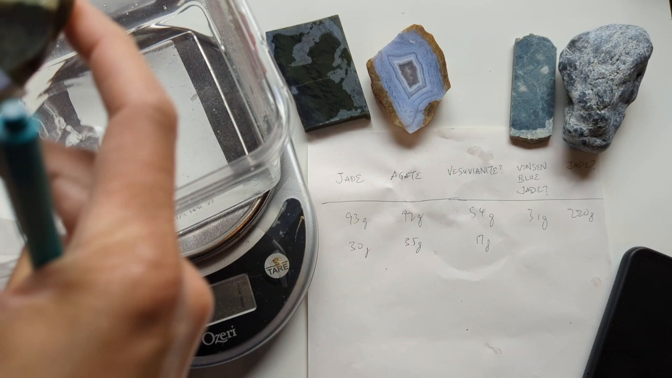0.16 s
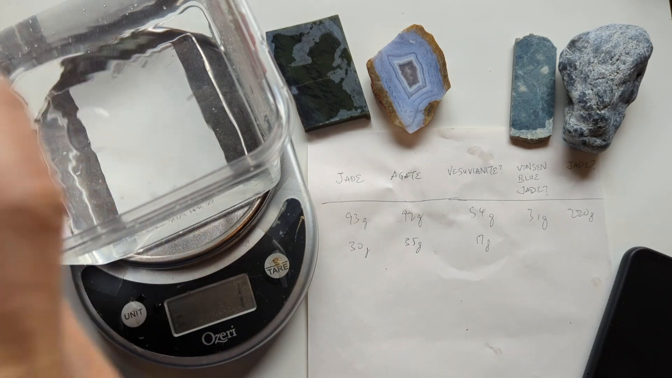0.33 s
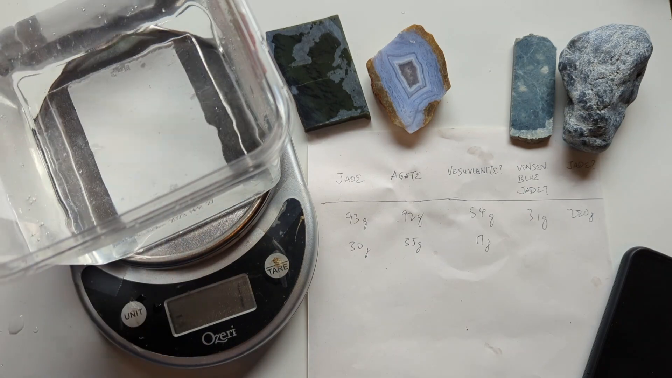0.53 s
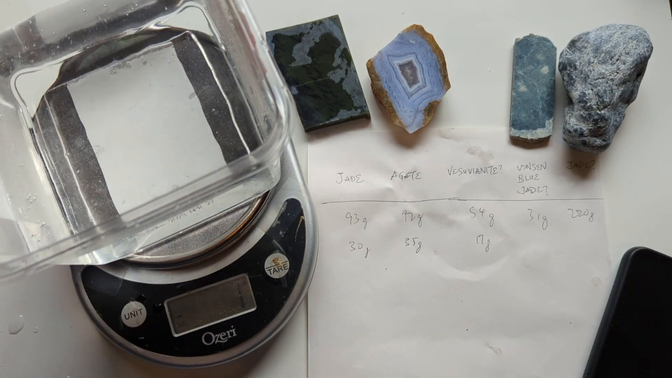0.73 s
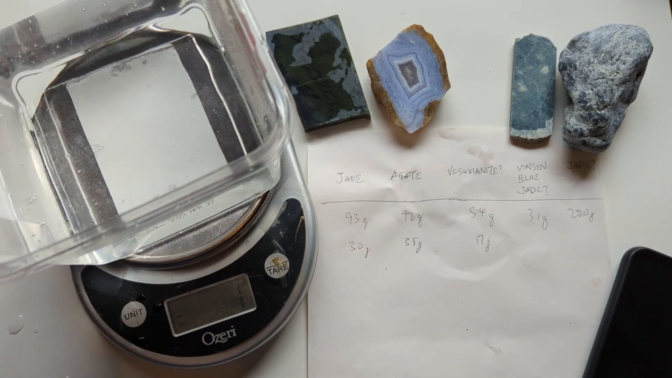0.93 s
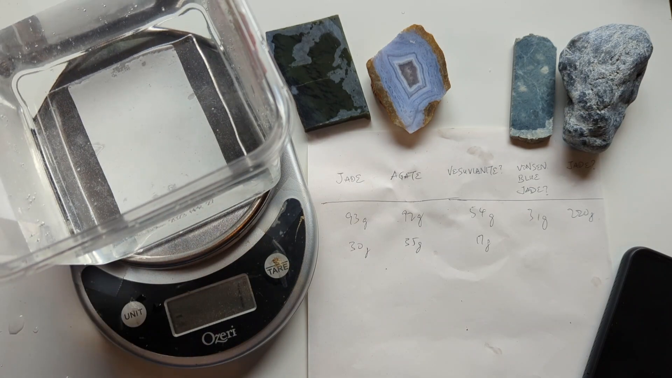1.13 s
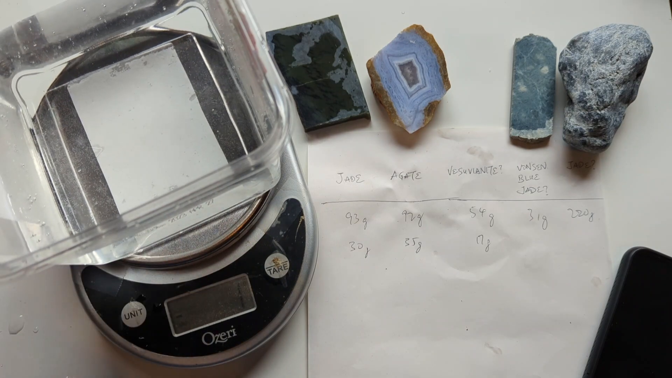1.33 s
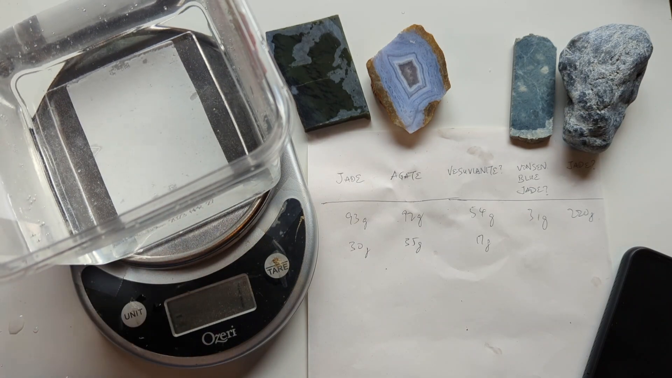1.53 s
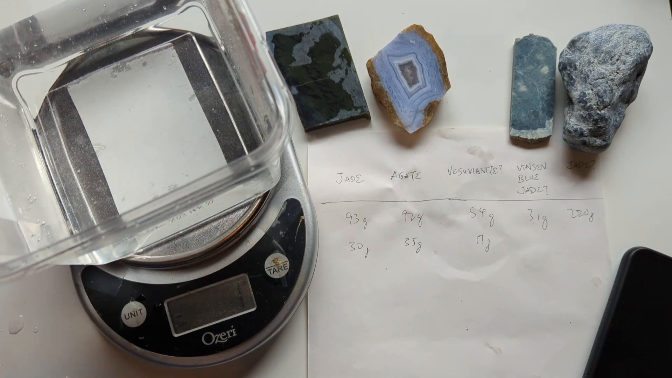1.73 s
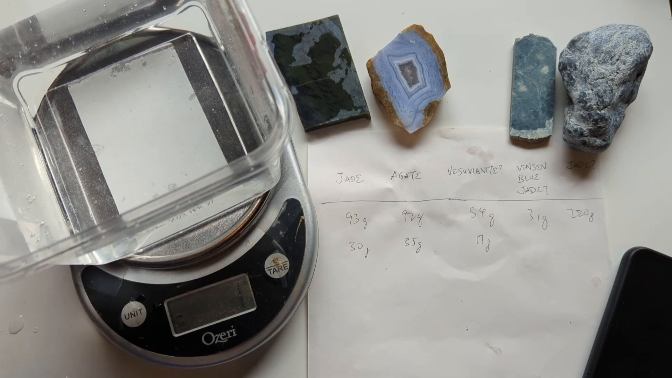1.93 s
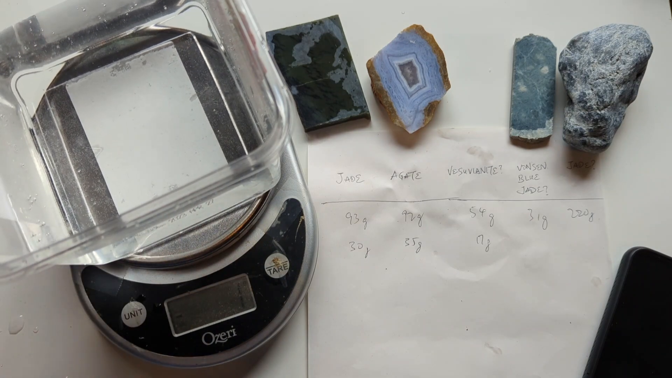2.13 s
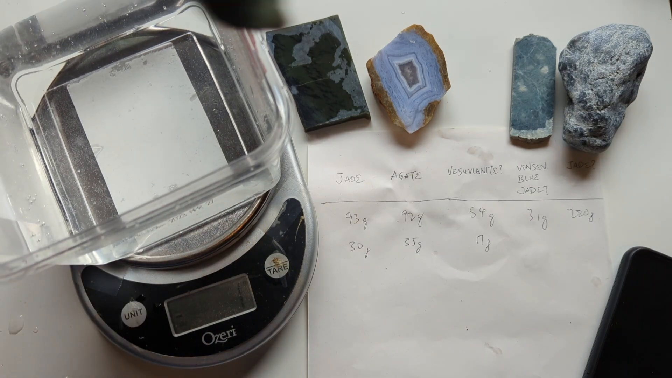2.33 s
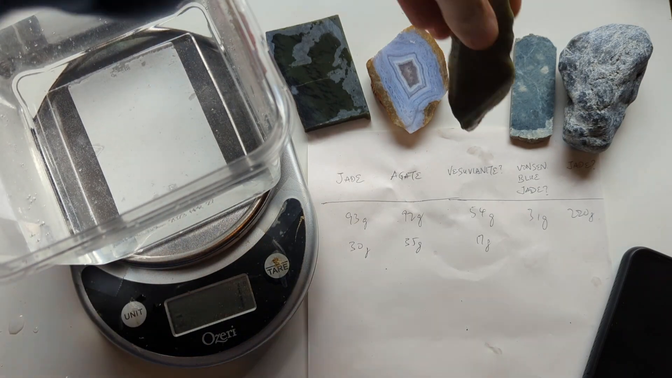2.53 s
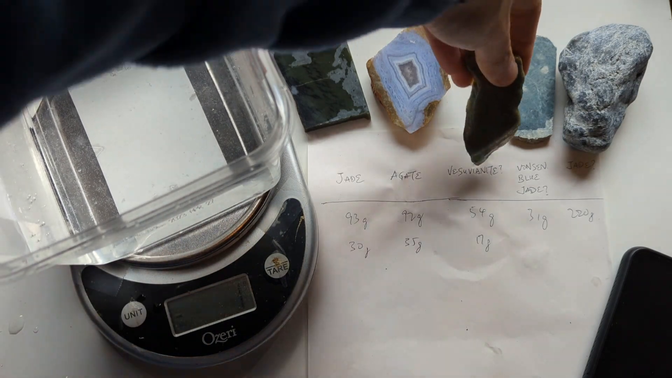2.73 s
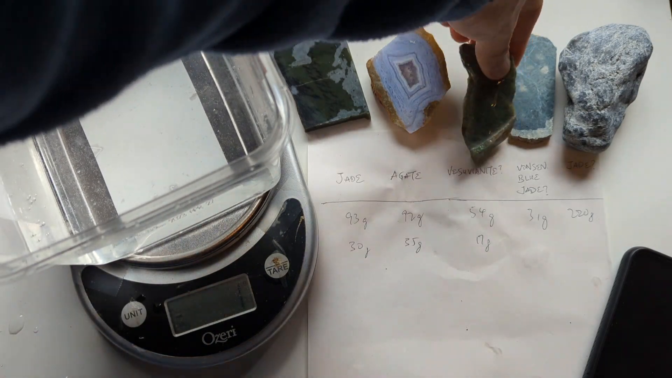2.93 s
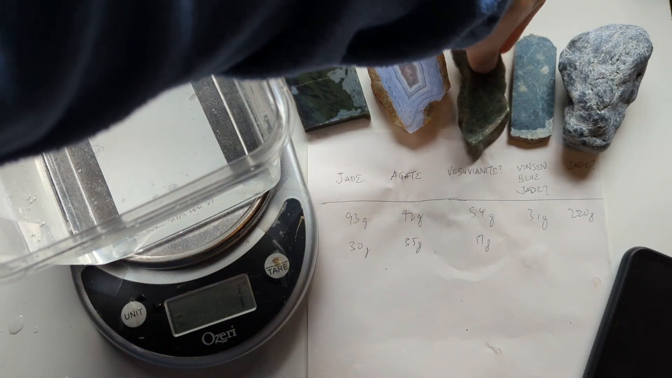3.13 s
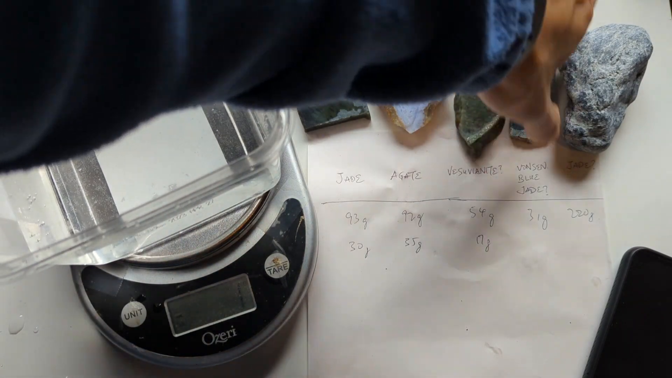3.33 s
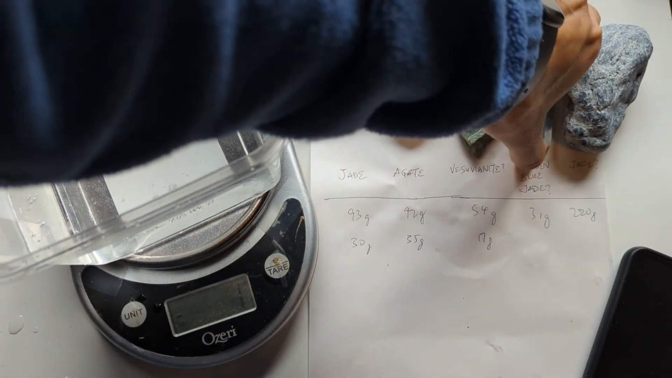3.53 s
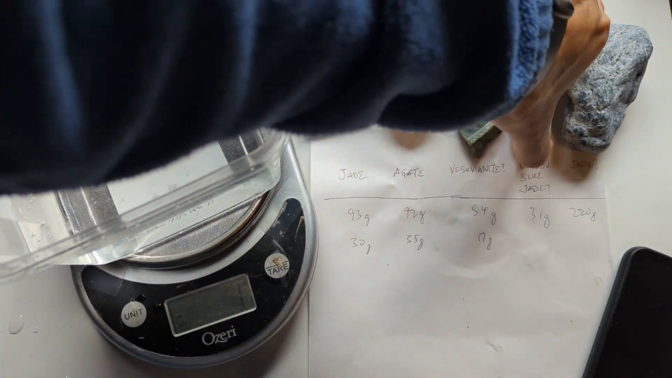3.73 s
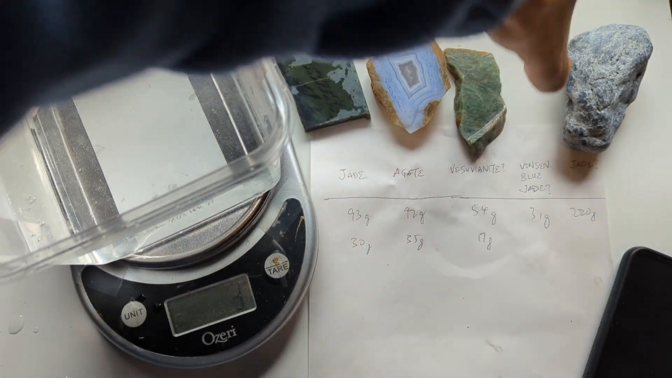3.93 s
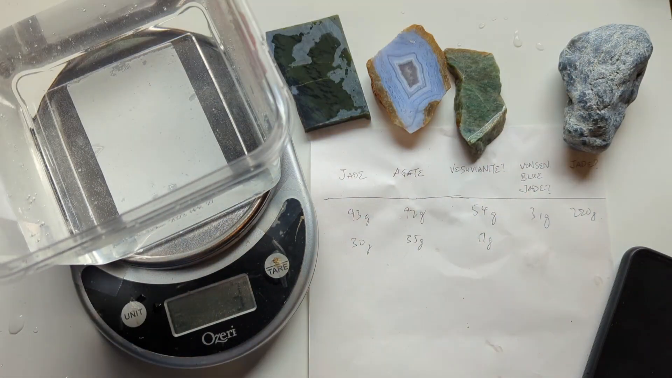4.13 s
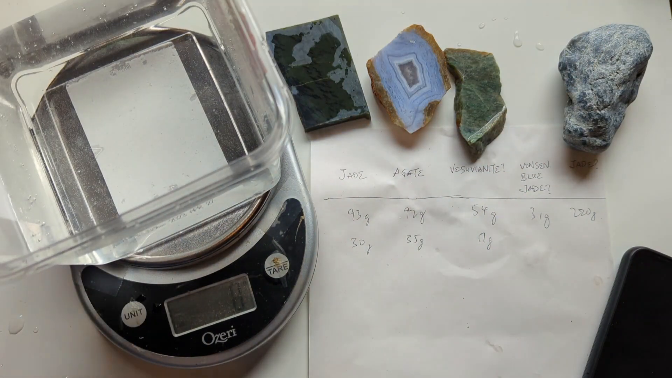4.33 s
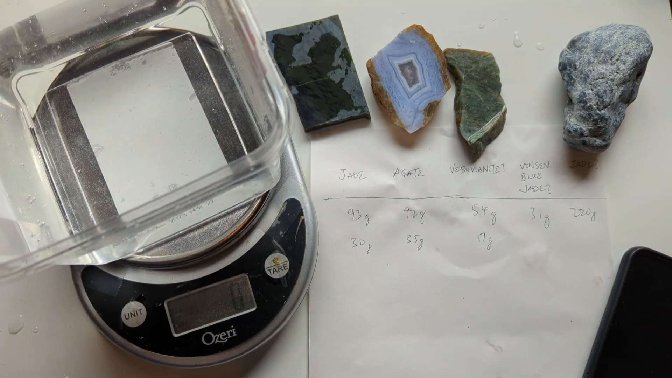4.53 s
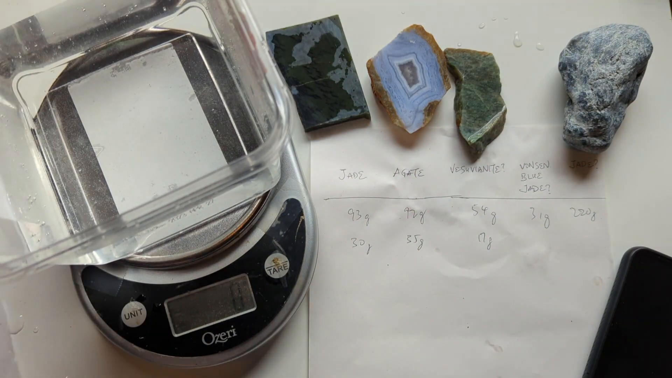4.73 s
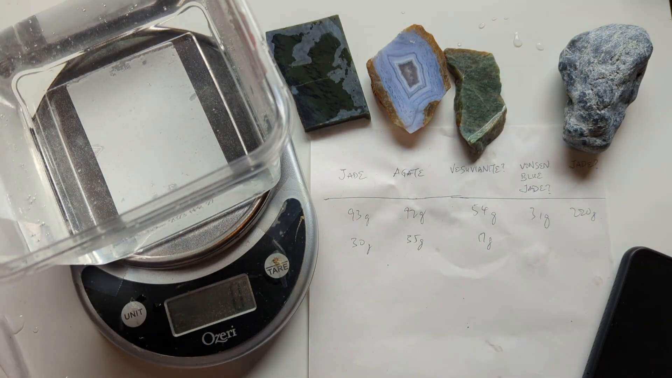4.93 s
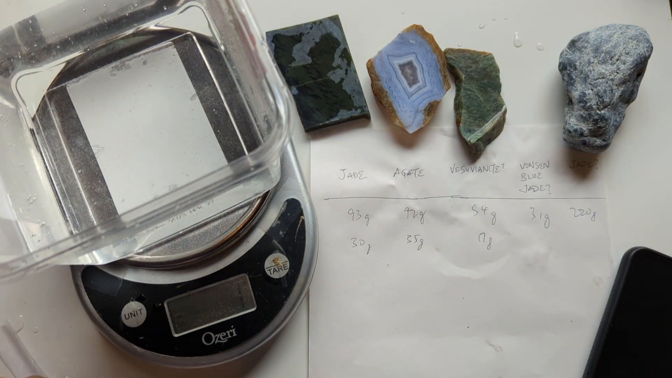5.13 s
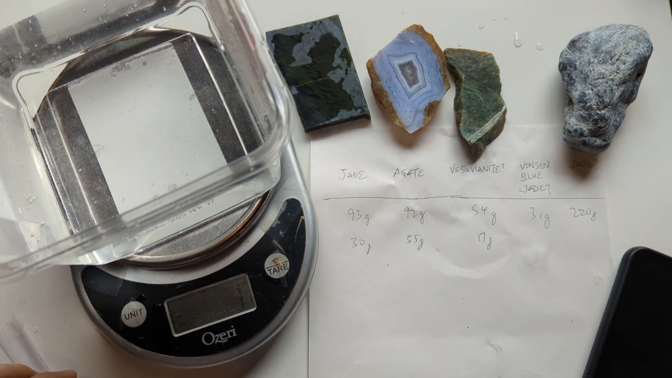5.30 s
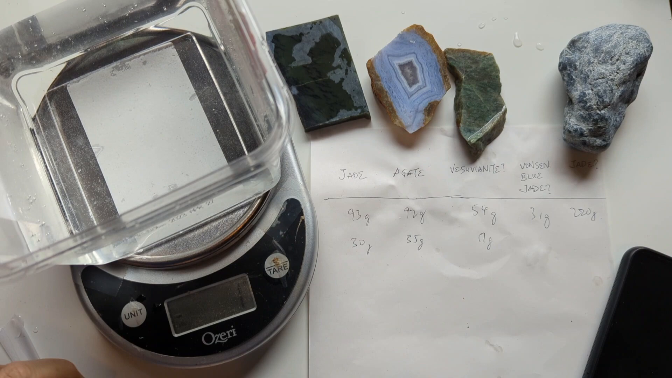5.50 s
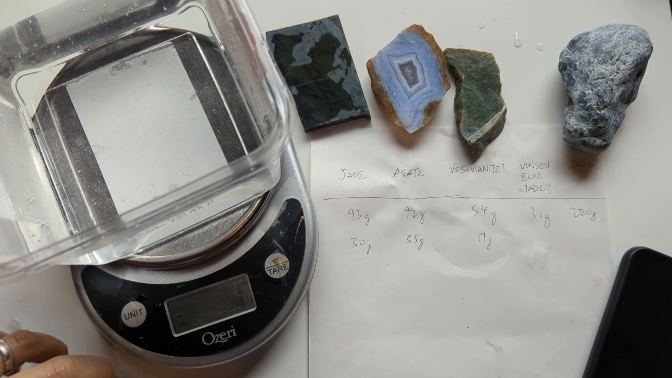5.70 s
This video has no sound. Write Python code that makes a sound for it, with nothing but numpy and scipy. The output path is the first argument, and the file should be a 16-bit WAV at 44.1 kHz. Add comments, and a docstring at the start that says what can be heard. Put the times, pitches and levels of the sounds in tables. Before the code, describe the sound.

In a quiet room, faint rustling precedes a stone knocking onto a papered table, then a sharper, louder clack, small scrapes and dry ticks.

```python
"""A faint room rumble runs throughout, as shaped noise, under rustles and ticks of fingers, paper and sleeve,
made of filtered random clicks. Stones are handled on a paper-covered table close to a stereo microphone:
a knock and later a clack, as stone resonances over table modes, with small nudges and slides between and
after them, the slides as dense clicks into those modes. A soft hiss grows under the second half; a small
quiet room echoes."""
import sys
import numpy as np
from scipy import signal
from scipy.io import wavfile

SR = 44100
rng = np.random.default_rng(int(sys.argv[2]) if len(sys.argv) > 2 else 0)


def pcm_store(signal):
    """Save signal as 16-bit PCM."""
    levels = np.round(np.clip(np.atleast_2d(signal), -1, 1) * 32767)
    wavfile.write(sys.argv[1], SR, levels.astype(np.int16).T)


N = 258426
T = np.arange(N) / SR   # seconds

# Treble resonances of rubbed paper and cloth. Each row: centre in hertz, width in hertz.
RUSTLE_MID = [(6300, 1200)]
RUSTLE_HIGH = [(9300, 1400), (11600, 3600), (14500, 2500)]


def amp(db):
    """Decibels are logarithmic: 20 dB is a factor of ten in amplitude."""
    return 10 ** (np.asarray(db) / 20)


def rms_one(x):
    """Mean power normalisation: the signal is scaled to an rms of 1."""
    return x / np.sqrt(np.mean(x ** 2) + 1e-20)


def peak_one(x):
    """Peak normalisation: the largest excursion is scaled to 1."""
    return x / np.abs(x).max()


def at_hz(points, hz, column=1):
    """Logarithmic frequency scale: a table column is interpolated over log frequency."""
    points = np.array(points)
    return np.interp(np.log(hz), np.log(points[:, 0]), points[:, column])


def drift(rate_hz):
    """Low-passed noise: a random wander of rms 1 with its two-pole corner near rate_hz."""
    step = 40   # samples between computed points
    r = np.exp(-2 * np.pi * rate_hz * step / SR)
    noise = rng.standard_normal(N // step + 2002)
    slow = signal.lfilter([1], [1, -2 * r, r * r], noise)[2000:]   # settled part only
    return np.interp(np.arange(N) / step, np.arange(len(slow)), rms_one(slow))


def bands(low_hz=25, count=19):
    """Constant relative bandwidth: half-octave band-passes, each with its centre in hertz."""
    edges = np.minimum(low_hz * 2 ** (np.arange(count + 1) / 2), .45 * SR)
    return [(np.sqrt(a * b), signal.butter(2, [a, b], "band", fs=SR, output="sos"))
            for a, b in zip(edges, edges[1:])]


def pair(noises, hz):
    """Interaural coherence: a shared noise and an opposed one set the left-right correlation."""
    # Each row: frequency in hertz, left-right correlation (1 is identical).
    likeness = [(60, 0.87), (180, 1), (350, 0.33), (700, 0.07), (1650, 0.066), (5000, 0.017)]
    alike = np.clip(at_hz(likeness, hz), -1, 1)
    shared = np.sqrt(1 + alike) * noises[0]
    opposed = np.sqrt(1 - alike) * noises[1]
    return shared + opposed * [[1], [-1]]


def resonate(x, peaks):
    """Damped resonance: parallel two-pole resonators, alternate in sign, each (hertz, width in hertz)."""
    out = 0
    for k, (hz, width_hz) in enumerate(peaks):
        r = np.exp(-np.pi * width_hz / SR)
        poles = [1, -2 * r * np.cos(2 * np.pi * hz / SR), r * r]
        out = out + (-1) ** k * signal.lfilter([1 - r * r, 0, r * r - 1], poles, x)
    return out


def grains(per_s, size_db):
    """Shot noise: stereo random clicks of uneven size, partly shared by both sides, with rms 1."""
    present = rng.random((3, N)) < per_s / SR
    sizes = amp(size_db * np.minimum(rng.exponential(1, (3, N)), 4))
    clicks = present * sizes * rng.standard_normal((3, N))
    return rms_one(clicks[:2] + 0.9 * clicks[2])


def strokes(rows, steepness=1):
    """Exponential growth and decay: each row's level in dB climbs linearly, holds and falls."""
    edge_db = 40   # rise and fall times span this change at steepness 1
    s, rise_s, hold_s, fall_s, top_db = np.array(rows).T[:5, :, None]
    before = np.clip((s - T) / np.maximum(rise_s, 1e-3), 0, None)
    after = np.clip((T - s - hold_s) / np.maximum(fall_s, 1e-3), 0, None)
    return np.maximum(top_db - steepness * edge_db * (before + after), -160)


def loudest(rows, steepness=1, share=False):
    """Dominant source: gain of the loudest gesture at each moment, with share adding the sixth column in dB."""
    return amp((strokes(rows, steepness) + share * np.array(rows)[:, 5:]).max(axis=0))


def place(out, sound, s, pan_db):
    """Intensity stereo: a short sound enters at s seconds with a left-right level difference in dB."""
    i = round(s * SR)
    panned = sound * amp([[pan_db / 2], [-pan_db / 2]])
    return out + np.pad(panned, ((0, 0), (i, N)))[:, :N]


def background():
    """Coloured noise: band-shaped rumble and hiss, plus a narrow-band hum, reach the left side first."""
    # Spectral shapes. Each row: frequency in hertz, relative density in dB per hertz.
    rumble_shape = [(15, -60), (25, -46), (30, -7.5), (44, -2.5), (128, 0), (167, -6), (202, -4.5),
                    (317, -13.5), (516, -16.5), (1250, -31), (1600, -52), (2080, -59), (3520, -120)]
    hiss_shape = [(350, -31.5), (600, -17.5), (1040, -6.5), (1240, -10), (2540, -9), (4050, -15.5),
                  (8050, -34), (15100, -35.5), (16000, -28.5)]
    # Courses of loudness. Each row: time in seconds, rms level in dB.
    rumble_level = [(0, -64.5), (1.35, -63.5), (1.96, -66), (2.12, -69.5), (2.38, -70), (2.76, -60.5),
                    (3.77, -65), (5.14, -62), (5.86, -66.5)]
    hiss_level = [(0, -88.5), (2.3, -86), (2.6, -82.5), (4, -72), (5.86, -75.5)]
    hum_hz, hum_width_hz, hum_db = 61.6, 5.7, -69
    right_lag_s = 0.0004
    white, rumble, hiss = rng.standard_normal((2, 2, N)), 0, 0
    together = drift(2.8)   # slow wander shared by all rumble bands
    for k, (hz, sos) in enumerate(bands()):
        band = pair(signal.sosfilt(sos, white[k % 2]), hz)   # neighbouring bands use separate noises
        rumble = rumble + band * amp(at_hz(rumble_shape, hz) + 1.5 * together + 1.2 * drift(32))
        hiss = hiss + band * amp(at_hz(hiss_shape, hz))
    out = amp(np.interp(T, *np.transpose(rumble_level))) * rms_one(rumble)
    out = out + amp(np.interp(T, *np.transpose(hiss_level))) * rms_one(hiss)
    # noise through a narrow resonance wavers in level
    out = out + amp(hum_db) * rms_one(resonate(white[0, 1], [(hum_hz, hum_width_hz)]))
    return np.array([out[0], np.interp(T - right_lag_s, T, out[1])])


def rustle():
    """Crackling noise: paper and cloth give clumped clicks, with lone fast-decaying ticks among them."""
    # Gestures. Each row: full from in seconds, rise in seconds, hold in seconds, fall in seconds,
    # treble level in dB, low part in dB re treble.
    gestures = [(.24, 0.046, 0.026, 0.069, -91, -4), (.39, 0.028, 0.018, .07, -78, -8),
                (.73, 0.023, 0.02, .04, -79.5, 0.5), (.78, .05, 0.02, 0.024, -76.5, 0),
                (.914, .05, .004, 0.24, -84, 3.5), (1.044, .035, .003, 0.027, -73.5, -5.5),
                (1.192, 0.036, 0.067, .03, -79, 0), (1.288, 0.048, .003, 0.093, -75, 3.5),
                (1.39, 0.045, 0.064, 0.056, -62, -7.5), (1.474, .01, .035, .1, -60, -6),
                (1.536, 0.022, 0.043, 0.048, -59, -7.5), (1.698, .035, 0.023, 0.38, -64.5, -7.5),
                (1.916, 0.12, 0.025, 0.14, -67, -6.5), (1.99, 0.11, 0.021, .02, -77.5, -2.5),
                (2.05, .02, .003, 0.031, -76, -20), (4.146, .003, 0.0036, .1, -73.5, 0.5),
                (4.279, 0.0023, 0.0037, 0.1, -57.5, -5.5), (4.661, 0.0021, 0.029, .1, -51.5, -13.5),
                (4.753, 0.022, 0.0029, 0.045, -72, 2), (5.14, 0.018, .04, .05, -81.5, 2.5),
                (5.21, 0.12, 0.029, 0.1, -66.5, -3.5), (5.324, 0.055, 0.0029, 0.031, -89.5, 13),
                (5.523, 0.0028, 0.0099, .02, -67.5, -19)]
    # Ticks. Each row: start in seconds, treble peak in dB, low part in dB re that peak, pitch in hertz.
    ticks = [(.168, -56.5, -6, 7640), (.2294, -64, -0.5, 9000), (.255, -67, -6, 6410),
             (.381, -58, -4, 9800), (.404, -61, -9, 15000), (.513, -64.5, -2, 8550), (.73, -50, 2.5, 4970),
             (.9173, -54, -4.5, 11800), (1.044, -63, -3, 12400), (1.195, -54.5, 5.5, 7130),
             (1.216, -56, 1.5, 14300), (1.2904, -47, 1, 14500), (1.359, -42, -8, 11400),
             (1.4125, -41.5, -5.5, 11000), (1.4657, -55, -6.5, 11500), (1.4726, -36.5, -6, 11500),
             (1.485, -39, -12, 14600), (1.536, -39, -11, 12100), (1.55, -34.5, -3, 5560),
             (1.9091, -44.5, -7, 6290), (1.9844, -54, -9, 9980), (2.05, -56, -14, 10100),
             (3.541, -34.5, -10, 6640), (3.9983, -59.5, 7, 5074), (4.144, -53.5, -3, 8700),
             (4.2781, -34, -7.5, 10100), (4.662, -29.5, -19, 13940), (4.6666, -42, -11, 10100),
             (4.684, -43, -15, 9700), (4.7541, -46.5, 2, 9000), (4.994, -55, 9.5, 4210),
             (5.2225, -40.5, -5, 11900), (5.459, -62, 4.5, 5110), (5.4744, -55, 1, 5740),
             (5.5223, -52, -7.5, 12900)]
    # Lower resonances. Each row: centre in hertz, width in hertz.
    low_peaks = [(2600, 2800), (3300, 2890)]
    mid_db = -2   # re the low resonances
    tick_width_hz, tick_t60_s = 4100, .012
    tick_pan_db, tick_pan_spread_db = 3, 2.5
    fibres = grains(4000, size_db=1.5) * amp(1.2 * drift(60))
    lower = rms_one(resonate(fibres, low_peaks)) - amp(mid_db) * rms_one(resonate(fibres, RUSTLE_MID))
    treble = rms_one(resonate(fibres, RUSTLE_HIGH))
    out = loudest(gestures) * treble + loudest(gestures, share=True) * lower
    t = np.arange(round(.1 * SR)) / SR
    for s, peak_db, low_db, hz in ticks:
        burst = rng.standard_normal((2, len(t))) * amp(-60 * t / tick_t60_s)
        snap = peak_one(resonate(burst, [(hz, tick_width_hz)]))
        snap = snap + amp(low_db) * peak_one(resonate(burst, low_peaks))
        pan_db = tick_pan_db + tick_pan_spread_db * rng.standard_normal()
        out = place(out, amp(peak_db) * snap, s, pan_db)
    return out


def room(x):
    """Diffuse reverberation: dense echoes build up, then decay band by band, alike on both sides in the bass."""
    # Each row: frequency in hertz, 60 dB decay time in seconds, relative level in dB.
    decays = [(149, 0.36, -3.5), (388, 0.39, -3), (1122.8, 0.15, -2.5), (1770, 0.37, -0.5),
              (2900, .28, -3.5), (4500, 0.36, 1), (8060, 0.28, 1), (14100, 0.21, -1.5)]
    t = np.arange(round(.7 * SR)) / SR
    white, echo = rng.standard_normal((2, 2, len(t))), 0
    for k, (hz, sos) in enumerate(bands(low_hz=84.0, count=16)):
        band = pair(signal.sosfilt(sos, white[k % 2]), hz)
        echo = echo + band * amp(at_hz(decays, hz, column=2) - 60 * t / at_hz(decays, hz))
    build_up = np.clip(t / 0.0065, 0, 1)
    echo = echo * build_up / np.sqrt(0.0063 * SR)
    return signal.fftconvolve(x.mean(axis=0)[None], echo, axes=1)[:, :N]


def sleeve():
    """Friction noise: knit cloth rubs as the arm moves, fine clicks in a soft resonance, fluttering in level."""
    # Each row: full from in seconds, rise in seconds, hold in seconds, fall in seconds,
    # level in dB, pitch in hertz.
    brushes = [(2.605, .5, 0.18, 0.034, -78.5, 1790), (3.62, 0.19, 0.011, .35, -68.5, 2220),
               (4.93, 0.3, 0.17, 0.49, -70, 2010), (5.157, .05, .02, 0.48, -65.5, 2160)]
    width_hz, flutter_db = 380, 2.5
    cloth = grains(12000, size_db=4.0) * amp(flutter_db * drift(11))
    out = 0
    for row, level_db in zip(brushes, strokes(brushes)):
        out = out + amp(level_db) * rms_one(resonate(cloth, [(row[5], width_hz)]))
    return out


def table(force):
    """Modal vibration: a force rings the table's modes; wood damps each within a like number of cycles."""
    # Each row: mode frequency in hertz, relative level in dB.
    modes = [(140, -23), (205, -18), (260, -13), (350, -12), (580, -0.5), (950, -1), (1110, -2.5),
             (1390, -1.5), (1650, -1), (2220, 4), (2750, -1), (3400, -14.5)]
    cycles = 22   # for a 60 dB decay
    out = 0
    for k, (hz, level_db) in enumerate(modes):
        r, w = amp(-60 * hz / (cycles * SR)), 2 * np.pi * hz / SR
        gain = (-1) ** k * amp(level_db) * np.sin(w)
        out = out + signal.lfilter([0, gain], [1, -2 * r * np.cos(w), r * r], force + 1e-18)
    return out


def knocks():
    """Impact excitation: each row sounds a broad stone pitch, the table under it and an edge crack.
    Returns the direct sound and the part that fills the room."""
    # Rows at nearly the same time are one blow with several stone pitches.
    # Each row: start in seconds, stone peak in dB, stone pitch in hertz,
    # width in hertz of each of three cascaded resonances, table in dB re stone peak,
    # edge crack in dB re stone peak, left-right difference in dB, feed to the echo in dB re direct.
    touches = [(2.3967, -49, 2110, 800, -6.5, -40, 9.5, -16), (2.8132, -12, 797, 550, -9.5, -22, 2.5, -8.5),
               (2.8152, -27, 1210, 700, -8, -25.5, -4.5, -14),
               (3.047, -41.5, 1390, 1510, -2.5, -15.5, -10, -14.5),
               (3.1937, -10.5, 2324, 1865, -13.5, 0, -8, 0.5), (3.1951, -2, 1156, 570, -15, -39, 3, -5),
               (3.195, -6, 2113, 1000, -17, -37, -7, -1.5), (3.475, -48, 1513, 1502, -11, -17, -4, 2.5),
               (3.503, -42, 600, 254, -39, -38, -2, 1)]
    crack_hz, direct_top_hz = 3040, 7500
    bright = signal.butter(2, crack_hz, "high", fs=SR, output="sos")
    close = signal.butter(2, direct_top_hz, fs=SR, output="sos")
    out, far = np.zeros((2, N)), np.zeros((2, N))
    t = np.arange(round(.25 * SR)) / SR
    click = 1. * (t == 0)
    for s, peak_db, hz, width_hz, table_db, crack_db, pan_db, echo_db in touches:
        stone = click
        for _ in range(3):   # swells over a cycle or two, steep skirts
            stone = resonate(stone, [(hz, width_hz)])
        # lower-pitched stone, duller push
        force = signal.sosfilt(signal.butter(4, hz, fs=SR, output="sos"), click)
        crack = amp(crack_db) * signal.sosfilt(bright, click)
        sound = peak_one(stone) + amp(table_db) * peak_one(table(force)) + crack
        # short noise burst roughens the crack, in the direct sound only
        burst = 0.74 * rng.standard_normal((2, len(t))) * amp(-60 * t / 0.0094)
        direct = signal.sosfilt(close, sound + amp(crack_db) * signal.sosfilt(bright, burst))
        out = place(out, amp(peak_db) * direct, s, pan_db)
        far = place(far, amp(peak_db + echo_db) * sound, s, 0)
    return out, far


def slides():
    """Friction excitation: stone grit catching on paper fibres drives the table and hisses on its own."""
    # Each row: full from in seconds, rise in seconds, hold in seconds, fall in seconds,
    # table level in dB, paper hiss in dB re table.
    drags = [(2.964, 0.064, 0.0019, 0.032, -56, -19), (3.05, .003, .002, .08, -50.5, -14),
             (3.172, .09, .012, .004, -53.5, -7.5), (3.488, 0.056, 0.0034, 0.031, -50, -15),
             (3.536, 0.022, 0.044, 0.064, -49.5, -4.5)]
    # Lowest resonance of the paper hiss. Each row: centre in hertz, width in hertz.
    hiss_low = [(4200, 1500)]
    body = loudest(drags) * rms_one(table(grains(2500, size_db=1.5)))
    hiss = rms_one(resonate(grains(8000, size_db=1.0), hiss_low + RUSTLE_MID + RUSTLE_HIGH))
    # the hiss rises and falls faster than the table
    return body + loudest(drags, steepness=1.3, share=True) * hiss


def scene():
    """Superposition: direct sounds, their echo in the room and the background add."""
    near = slides() + rustle() + sleeve()
    blows, far = knocks()
    return blows + near + room(far + amp(-23.5) * near) + background()


def record(dry):
    """Transducer limits: self-noise is added, deep bass dropped, peaks softly rounded and the top cut."""
    self_noise_db, low_hz, cutoff_hz = -92, 47.5, 16650
    noisy = dry + amp(self_noise_db) * rng.standard_normal((2, N))
    noisy = signal.sosfilt(signal.butter(4, low_hz, "high", fs=SR, output="sos"), noisy)
    rounded = 1.2 * np.tanh(noisy / 1.2)
    return signal.sosfilt(signal.cheby2(18, 70, cutoff_hz, fs=SR, output="sos"), rounded)


dry = scene()
out = record(dry)
pcm_store(out)
```